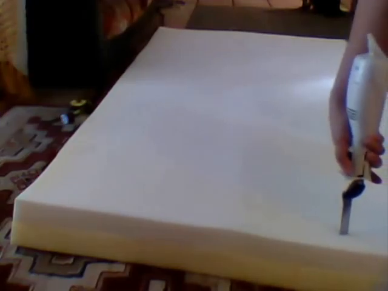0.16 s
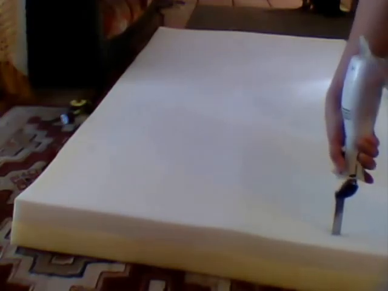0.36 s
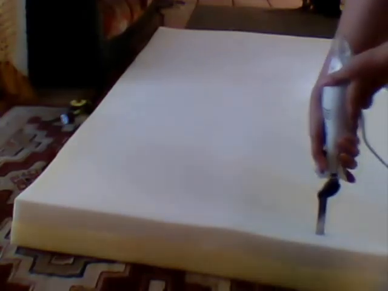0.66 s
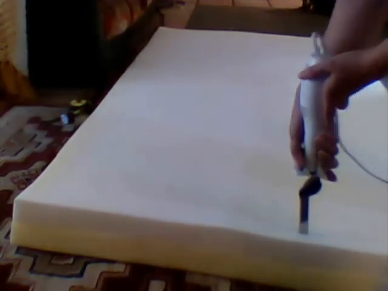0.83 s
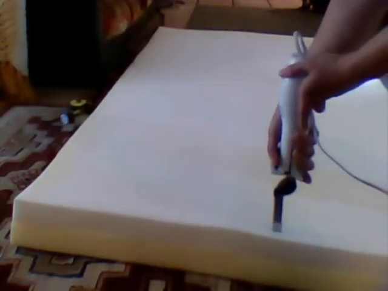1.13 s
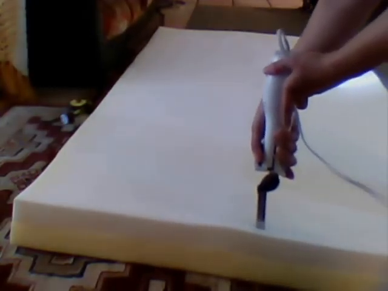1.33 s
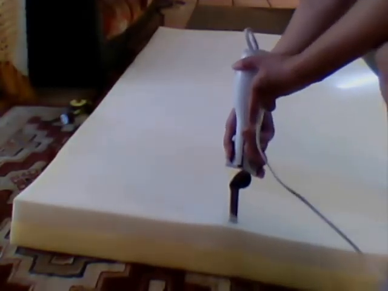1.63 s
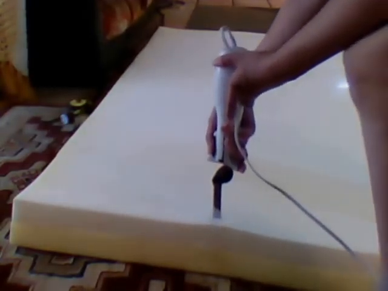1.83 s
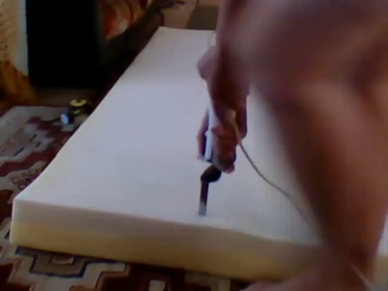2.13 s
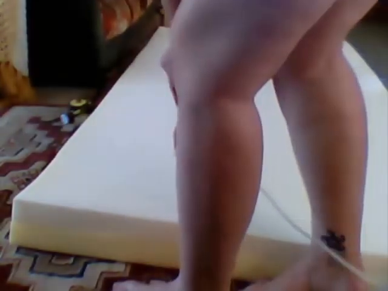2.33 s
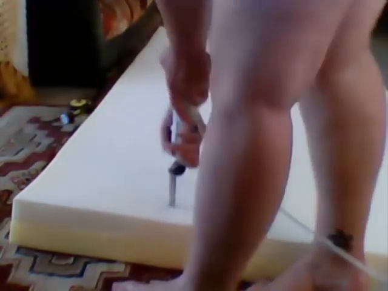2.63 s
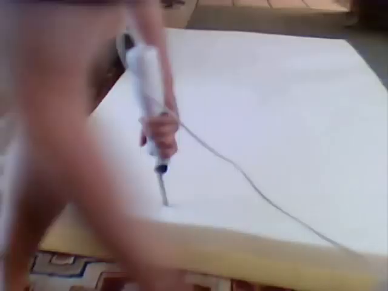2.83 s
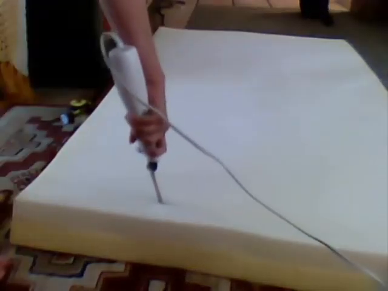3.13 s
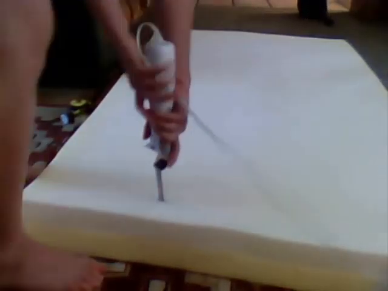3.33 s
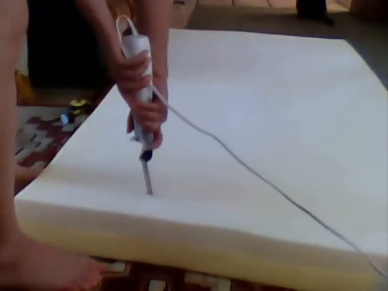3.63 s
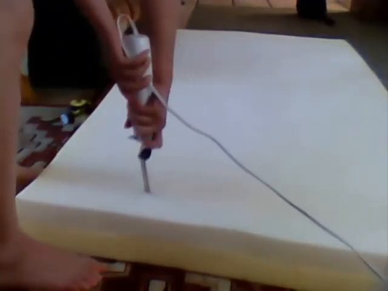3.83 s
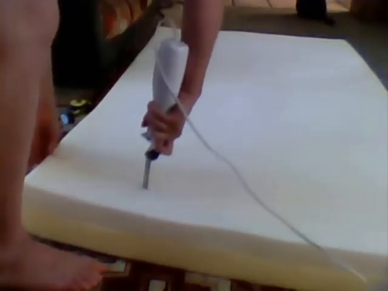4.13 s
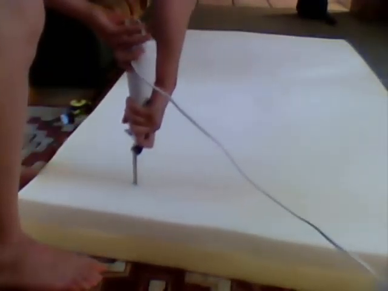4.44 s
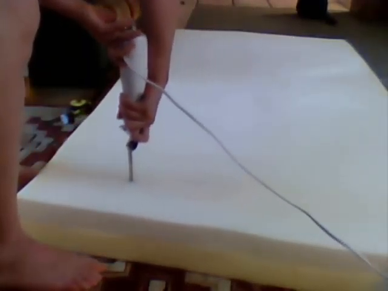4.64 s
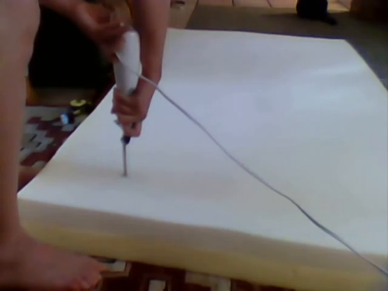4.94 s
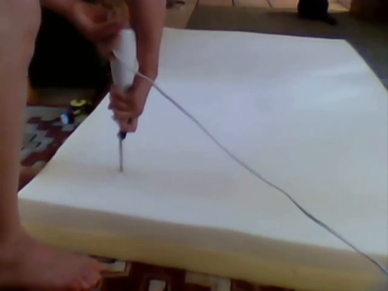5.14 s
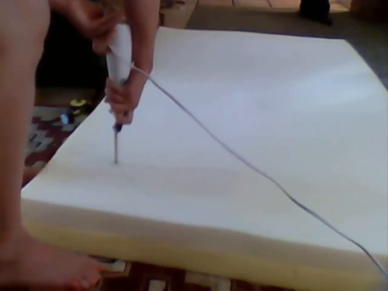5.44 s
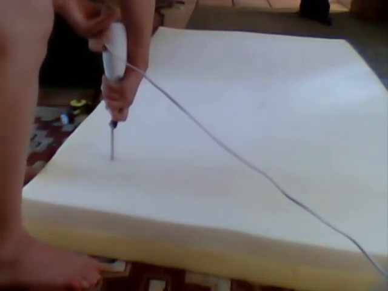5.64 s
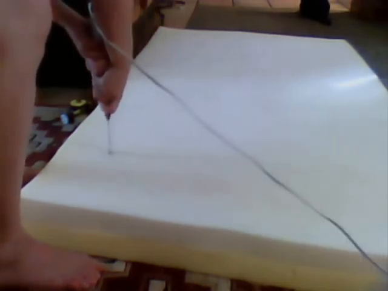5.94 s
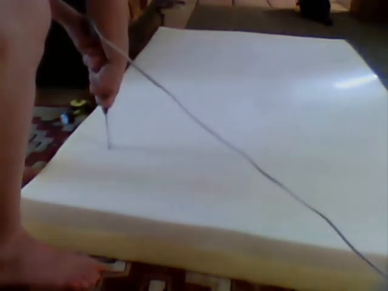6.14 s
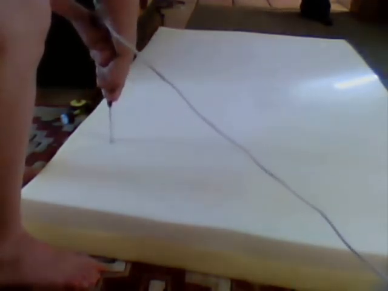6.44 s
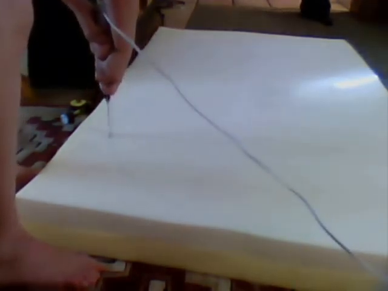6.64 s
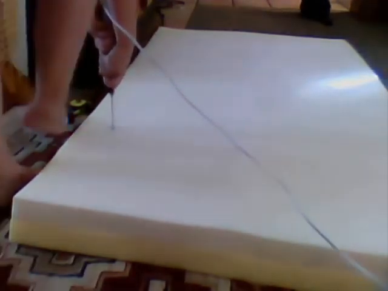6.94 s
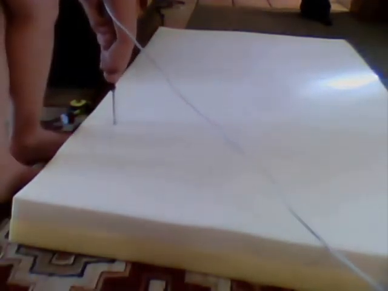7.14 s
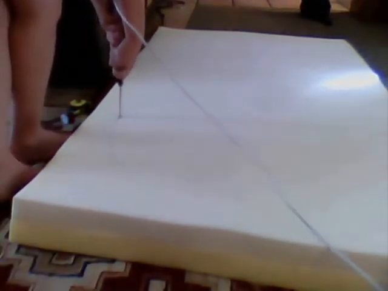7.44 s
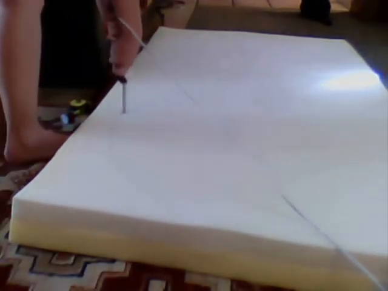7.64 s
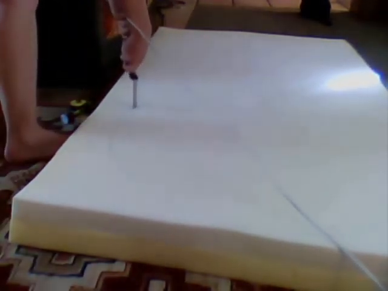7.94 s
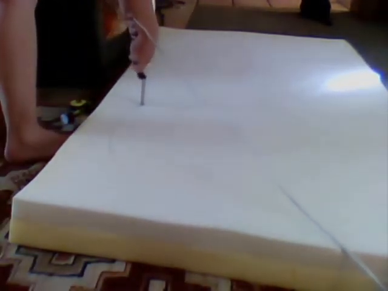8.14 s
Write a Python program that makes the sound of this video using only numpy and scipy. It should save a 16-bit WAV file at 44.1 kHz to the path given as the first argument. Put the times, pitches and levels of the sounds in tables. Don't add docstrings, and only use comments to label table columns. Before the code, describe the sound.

Close buzzing, hissing electric knife motor sawing foam in a room, its pitch dipping briefly, cutting out once, then growing duller.

```python
import sys
import numpy as np
from scipy import signal
from scipy.fft import rfft, irfft, next_fast_len
from scipy.io import wavfile
from scipy.ndimage import uniform_filter1d

SR = 44100
rng = np.random.default_rng(int(sys.argv[2]) if len(sys.argv) > 2 else 0)


def elevation(decibels):
    levels = np.asarray(decibels, float)
    return 10 ** (levels / 20)


def put_to_file(sound):
    columns = np.atleast_2d(sound).T
    safe = np.clip(columns, -1, 1)
    whole_steps = np.round(safe * 32767)
    wavfile.write(sys.argv[1], SR, whole_steps.astype(np.int16))


N = 365148
TIME = np.arange(N) / SR


def curves(rows):
    s, *columns = np.transpose(rows)
    return [np.interp(TIME, s, c) for c in columns]


def bumps(rows):
    return sum(np.outer(size, np.clip(1 - abs(TIME - s) / half, 0, 1)) for s, half, *size in rows)


def swell(start, length, db):
    outside_s = np.maximum(start - TIME, TIME - start - length)
    return db - 300 * np.clip(outside_s, 0, .5)


def unit(x):
    return x / np.sqrt(np.mean(np.atleast_2d(x)[0] ** 2))


def colour(x, shape):
    hz, db = np.transpose(shape)
    size = next_fast_len(N)
    bins = np.arange(1, size // 2 + 2) * SR / size
    gain = elevation(np.interp(np.log(bins), np.log(hz), db))
    return unit(irfft(rfft(x, size) * gain, size)[:, :N])


def walk(rate):
    hold = max(int(SR / rate), 2)
    steps = np.repeat(rng.standard_normal(N // hold + 1), hold)[:N]
    return unit(uniform_filter1d(uniform_filter1d(steps, hold), hold))


def tone(turns, db, wobble, rate, shiver_db):
    phase = 2 * np.pi * turns + wobble * walk(rate)
    side = elevation(-27) * np.cos(phase + 1.4 * walk(6))
    return np.sqrt(2) * elevation(db + shiver_db * walk(rate)) * np.array([np.sin(phase), side])


def breath(cycles, db, width_hz):
    phase = 2 * np.pi * cycles
    mid, side = (walk(width_hz) * np.sin(phase) + walk(width_hz) * np.cos(phase) for _ in range(2))
    return elevation(db) * np.array([mid, elevation(-16.0) * side])


def puffs(turns, first, second, length, scatter_db, side_db):
    half_turn = (2 * turns).astype(int)
    scatter = elevation(scatter_db * rng.standard_normal(N))[half_turn]
    size = np.where(half_turn % 2, second, first) * scatter
    flare = 1 + size * np.exp(-(2 * turns % 1) / length)
    return flare * rng.standard_normal((2, N)) * elevation(np.array([[0], [side_db]]))


# moment of lowest speed in seconds, bar rate lost in Hz.
TRIGGER_SLIPS = [
    (.12, 400),
    (.27, 460.7),
    (.61, 450),
    (1.94, 170),
    (2.855, 440.5),
    (3.75, 500),
]


def slips(fall_s, rise_s, lead_s):
    late = [(TIME - s + lead_s, hz) for s, hz in TRIGGER_SLIPS]
    return sum(hz * np.where(t < 0, np.clip(1 + t / fall_s, 0, 1), np.exp(-abs(t) / rise_s)) for t, hz in late)


def power_lost():
    return slips(fall_s=.03, rise_s=.025, lead_s=.012) / 450


# time in seconds, bar rate in Hz.
BAR_RATE = [(0, 2905), (.2, 3020), (.5, 3092), (.75, 3047), (.9, 2890), (1.23, 2925), (1.45, 2847),
            (2.0, 2858), (2.55, 2807), (2.66, 2873), (2.85, 3155), (3.4, 3153), (3.7, 2913), (3.85, 3062),
            (5.3, 2979), (6.5, 2938), (6.9, 2882), (8.28, 2910)]
# time in seconds, half length in seconds, bar rate change in Hz.
HAND_PRESSES = [(.165, .05, 120), (.24, 0.039, -70), (2.04, .06, -55), (1.51, 0.049, 40), (1.56, 0.11, -25),
                (2.1, .07, 65), (2.39, 0.046, 65), (3.06, 0.028, -90), (3.31, 0.079, -90),
                (4.14, 0.054, -35.5), (4.29, 0.098, -40), (4.58, 0.17, 30), (4.75, 0.059, -15),
                (5.1, 0.11, 25), (5.56, .03, 110.5), (5.82, .08, 100), (5.88, .06, 90), (7.1, 0.16, 18.5),
                (7.3, .1, -12), (7.5, 0.19, 15)]


def bars_passed():
    bar_hz = curves(BAR_RATE)[0] + bumps(HAND_PRESSES)[0]
    bar_hz = bar_hz - slips(fall_s=.03, rise_s=.048, lead_s=0)
    return np.cumsum(bar_hz) / SR


# time in seconds, brush hiss in dB.
TRAVEL = [(0, -39), (.06, -35), (.22, -35), (.4, -34.5), (.7, -36), (.86, -37), (2.04, -38.5), (2.5, -42),
          (2.63, -38), (2.89, -36), (4.26, -38), (5.89, -39), (5.93, -46.5), (6.43, -43.5), (6.9, -46.5),
          (7.3, -49), (7.5, -46.5), (8.28, -45)]
# time and half length in seconds, level in dB.
WRIST_SWINGS = [(.022, .013, -15.5), (.56, .04, 2), (.69, .04, 2), (2.11, .1, 3), (2.25, 0.032, -4),
                (2.31, 0.055, 1), (2.89, .08, 2), (3.41, .12, 1.5), (4.36, .1, 1), (6.06, 0.035, 3.5),
                (6.13, 0.047, -0.5), (6.53, .15, 5), (6.24, .08, 1.5), (6.42, 0.027, -2.5),
                (6.74, 0.039, -1), (6.87, .04, 0), (7.0, .1, 3.5), (7.11, .06, 5.5), (7.36, .03, -3.5),
                (7.45, .04, 3.5), (7.51, 0.023, -1), (7.57, .035, 2.5), (7.65, 0.057, -3), (7.73, 0.048, 2),
                (7.78, 0.023, -1), (7.87, .04, -3), (7.94, 0.021, -1), (8.04, 0.037, -2), (8.13, .06, -0.5),
                (8.22, 0.044, 0.5)]


def hiss_level():
    db = curves(TRAVEL)[0] + bumps(WRIST_SWINGS)[0] - 5.5 * power_lost()
    return uniform_filter1d(db, size=SR // 40)


def far_drone():
    return tone(93.5 * TIME, swell(6.36, .76, -72), wobble=.3, rate=10, shiver_db=3.5)


# time in seconds, level in dB.
HUM_LEVEL = [
    (0, -59),
    (.25, -59.5),
    (.62, -56.5),
    (2.04, -55),
    (2.65, -55.5),
    (3.05, -56.5),
    (3.5, -55.5),
    (5.8, -56),
    (8.28, -57.5),
]


def field_hum(shade_db):
    hum_db = curves(HUM_LEVEL)[0] + 0.43 * shade_db + 1.0 * walk(9)
    return tone(480.5 * TIME, hum_db, wobble=0.23, rate=25, shiver_db=-1.1)


# frequency in Hz, density in dB per Hz.
FOAM_RASP = [(18, -28), (30, 0.5), (100, -1.5), (300, -2), (800, -1.5), (1500, -1.5), (2400, -2),
             (3500, -16.5)]


def blades(turns, hiss_db, shade_db):
    rasp = puffs(turns, first=1.33, second=1.0, length=0.23, scatter_db=2.0, side_db=-12.5)
    db = hiss_db - 12 - 0.14 * shade_db
    return colour(rasp, FOAM_RASP) * elevation(db + 0.7 * walk(12))


# frequency in Hz, density in dB per Hz.
CASING_RATTLE = [(1500, -27.5), (2600, -3), (3300, -1.5), (4200, -1), (5400, 0), (6500, -2), (8000, -27)]


def casing_rattle(turns, hiss_db, shade_db):
    knocks = puffs(turns, first=0.88, second=1.0, length=0.4, scatter_db=2.0, side_db=-13.0)
    return colour(knocks, CASING_RATTLE) * elevation(hiss_db - 10 - 0.099 * shade_db)


# start in seconds, length in seconds, Hz, level in dB.
PANEL_RINGS = [
    (.18, .05, 10050, -48),
    (.46, .08, 10050, -49),
    (.68, .04, 10050, -43),
    (2.16, .04, 10050, -45),
    (2.08, .6, 6600, -54),
    (6.8, .55, 5750, -60),
    (7.4, .52, 5750, -62),
]


def panels():
    return sum(breath(hz * TIME, swell(s, length, db), width_hz=550) for s, length, hz, db in PANEL_RINGS)


# time in seconds, pitch in Hz, level in dB.
SLOT_WHISTLE = [
    (3.7, 12200, -70),
    (3.85, 12200, -46),
    (4.03, 11300, -46),
    (4.35, 12200, -41.5),
    (4.55, 11500, -45),
    (4.72, 11800, -43),
    (4.95, 11900, -45),
    (5.6, 12300, -48),
    (5.9, 12300, -75),
]


def slot_whistle():
    hz, db = curves(SLOT_WHISTLE)
    return breath(np.cumsum(hz) / SR, db + 1.5 * walk(14), width_hz=1700)


# start in seconds, length in seconds,
# multiple of the turns, level in dB.
ROTOR_ORDERS = [(1.1, .45, 40, -53), (2.07, .17, 40, -52), (7.3, .2, 40, -63), (.42, .15, 30, -53),
                (.68, .14, 30, -56), (2.07, .08, 30, -50), (2.15, .15, 30, -56), (3.25, .47, 30, -52),
                (5.75, .18, 30, -52), (5.93, .42, 30, -58), (.33, .1, 21, -52), (3.08, .14, 21, -57),
                (7.05, .15, 14, -68), (7.65, .25, 14, -69), (7.92, .4, 14, -66), (8.03, .3, 12, -71),
                (5.6, .55, 4, -68)]


def rotor_orders(turns):
    total = 0
    for multiple in (40, 30, 21, 14, 12, 4):
        levels = [swell(s, length, db) for s, length, k, db in ROTOR_ORDERS if round(k) == multiple]
        total = total + tone(multiple * turns, np.max(levels, axis=0), wobble=.35, rate=150, shiver_db=1.5)
    return total


# frequency in Hz, density in dB per Hz.
BRUSH_SPARKS = [(7000, -29.5), (9000, -11), (10500, -4), (12000, -1), (14000, -2), (15800, -5.5)]
# frequency in Hz, density in dB per Hz.
AIR_RUSH = [(4000, -26.5), (5500, -5), (6500, 2.5), (8300, 1.5), (9800, -3.5), (11000, -7), (13000, -16)]


def brush_hiss(turns, hiss_db):
    gusts = puffs(turns, first=1.55, second=.75, length=.2, scatter_db=1.2, side_db=-14.6)
    sparks = colour(gusts, BRUSH_SPARKS) * elevation(0.04)
    air = colour(gusts, AIR_RUSH) * elevation(-6.48)
    return (sparks + air) * elevation(hiss_db)


# time in seconds, phase wobble in radians.
BAR_CHATTER = [
    (0, .15),
    (2.3, .15),
    (2.5, .35),
    (3.3, .2),
    (6.1, .3),
    (6.35, 1.25),
    (7.6, 1.15),
    (7.9, .8),
    (8.1, .2),
]
# time in seconds, whine in dB, its octave in dB.
WHINE_LEVEL = [(.08, -70, -62), (.15, -59, -45), (.4, -54, -44.5), (.57, -52.5, -44.5), (.78, -56, -51.5),
               (1.25, -55, -52), (1.87, -52.5, -49.5), (2.12, -54.5, -49.5), (2.63, -61, -51.5),
               (3.0, -58, -54), (3.4, -55.5, -54), (3.95, -51.5, -51.5), (4.8, -51.5, -51), (5.3, -60, -51),
               (5.5, -58, -60), (6.55, -58.5, -71), (6.8, -63.5, -64), (8.28, -63, -68)]
# time in seconds, half length in seconds,
# whine change in dB, octave change in dB.
WHINE_GLINTS = [(.13, .03, 0, 6), (.63, .04, 3, -3), (.77, .06, 0, -8), (1.13, .13, 3.5, 0),
                (1.97, .1, -10, -4), (2.9, .07, 1, 5), (3.1, .2, 2, 0), (3.2, .15, 0, 3), (3.36, .06, 0, 4),
                (3.78, .05, -2, 3), (5.55, .12, 0, 6), (5.72, .1, 0, 6), (5.82, .06, 0, 9),
                (5.88, .05, 2, 14), (7.08, .18, 5.5, 1), (7.47, .1, 4.5, 1), (7.65, .1, -3, -3),
                (7.9, .15, 0, 2), (8.15, .1, 3, -3), (8.23, .11, -3, 12)]


def bar_whine(bar):
    fuzz = curves(BAR_CHATTER)[0]
    whine_db, octave_db = curves(WHINE_LEVEL) + bumps(WHINE_GLINTS) - 16 * power_lost()
    whine = tone(bar, whine_db, wobble=fuzz, rate=170, shiver_db=1.3)
    octave = tone(2 * bar, octave_db, wobble=1.5 * fuzz, rate=200, shiver_db=1.3)
    return whine + octave


def motor(bar, turns, hiss_db, shade_db):
    flickering_db = hiss_db + 0.55 * walk(18)
    rattle = casing_rattle(turns, flickering_db, shade_db)
    air = slot_whistle() + brush_hiss(turns, flickering_db)
    return rattle + panels() + air + rotor_orders(turns) + bar_whine(bar)


# time in seconds, knife gain in dB, hum gain in dB.
DROPOUT = [
    (2.648, -1, 1.5),
    (2.69, -23, -8),
    (2.72, -41, -18),
    (2.75, -60, -28),
    (2.8, -77, -42),
    (2.816, -80, -60),
    (2.822, -44, -32),
    (2.84, -2.5, -3),
    (2.852, 0.5, 0),
]


def scene():
    bar = bars_passed()
    turns = bar / 10
    hiss_db = hiss_level()
    shade_db = hiss_db + 37
    knife_fade_db, hum_fade_db = curves(DROPOUT)
    knife = far_drone() + blades(turns, hiss_db, shade_db) + motor(bar, turns, hiss_db, shade_db)
    mid, side = knife * elevation(knife_fade_db) + field_hum(shade_db) * elevation(hum_fade_db)
    return np.array([1.077 * mid + side, 1.038 * mid - side])


def roll_off(x):
    return signal.sosfilt(signal.butter(12, 17050, fs=SR, output="sos"), x)


def record(dry):
    top_cut = signal.ellip(12, .2, 80, 15860, fs=SR, output="sos")
    offset = -.00026 * elevation(curves(DROPOUT)[1])
    mix = signal.sosfilt(top_cut, dry) + offset
    return roll_off(mix)


dry = scene()
out = record(dry)
put_to_file(out)
```